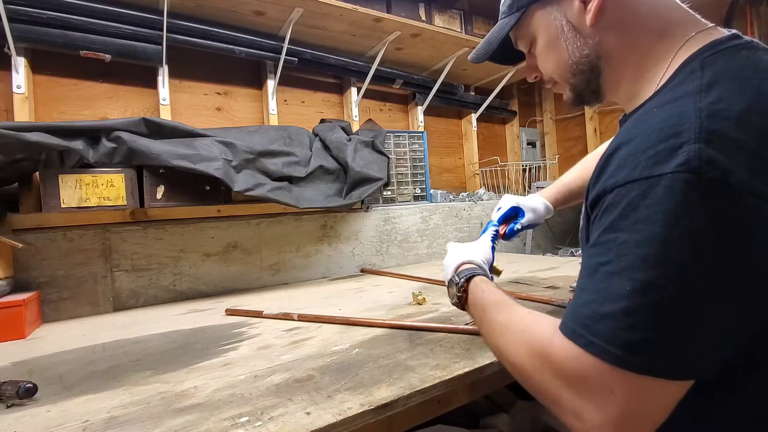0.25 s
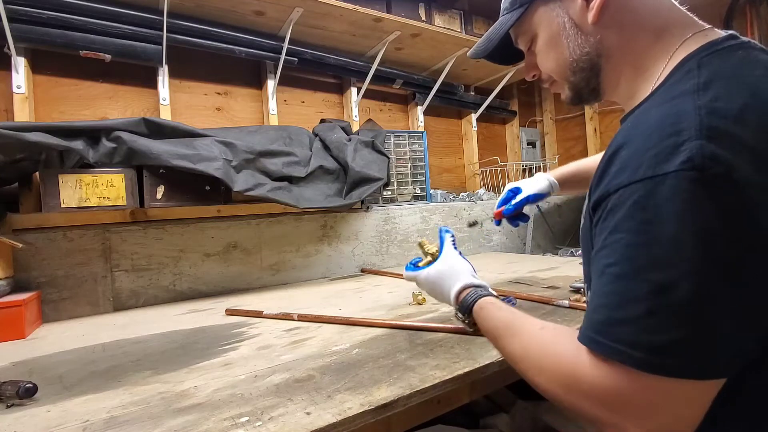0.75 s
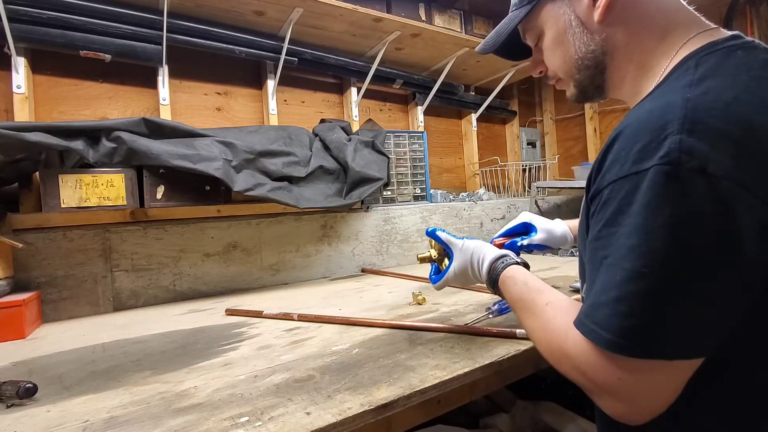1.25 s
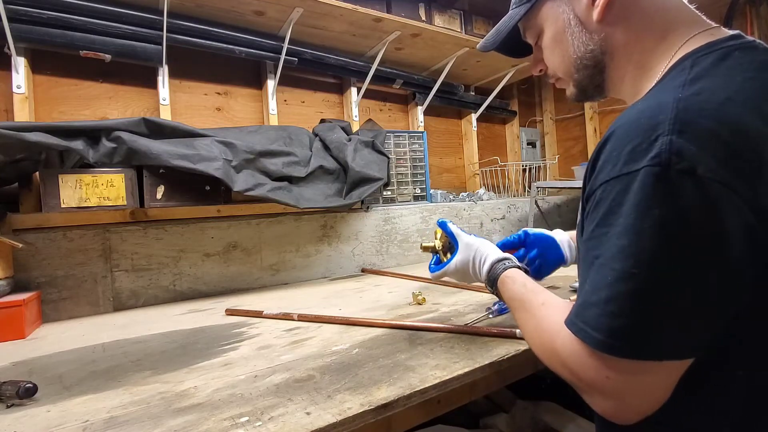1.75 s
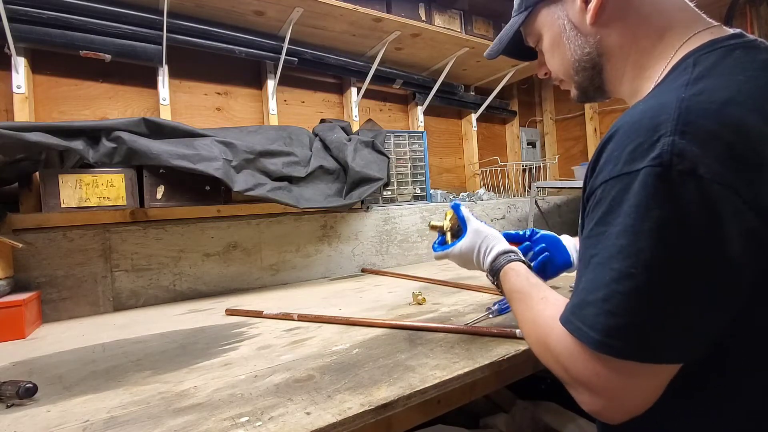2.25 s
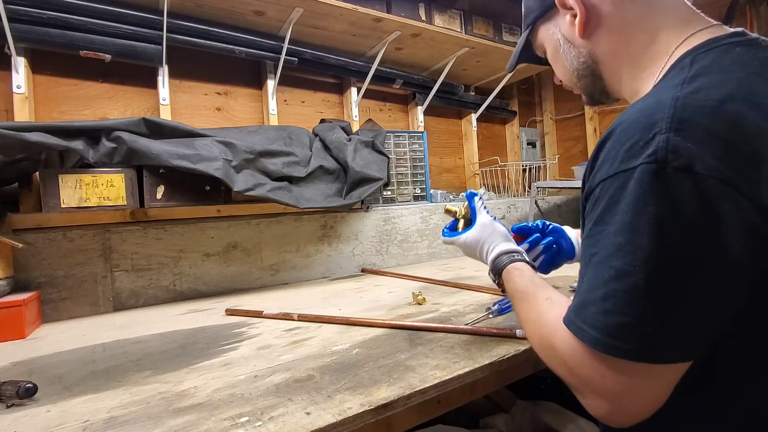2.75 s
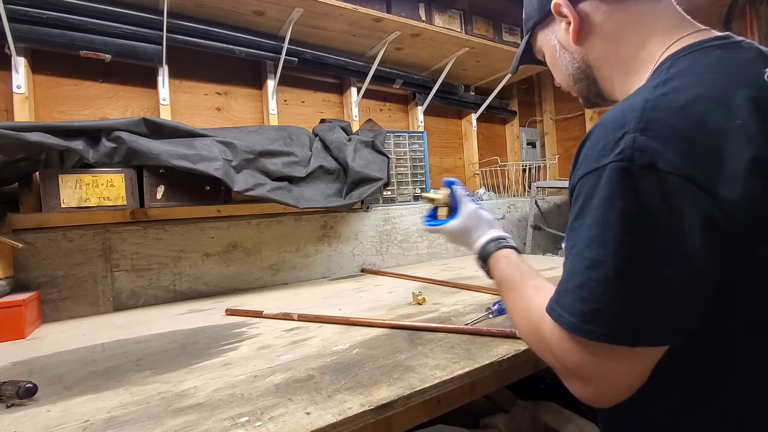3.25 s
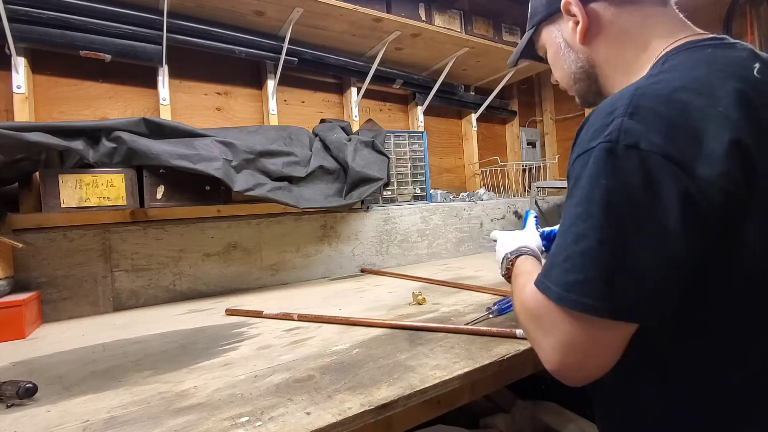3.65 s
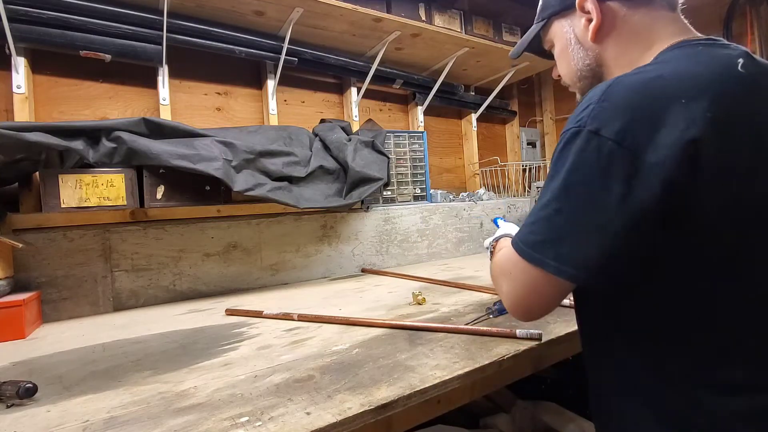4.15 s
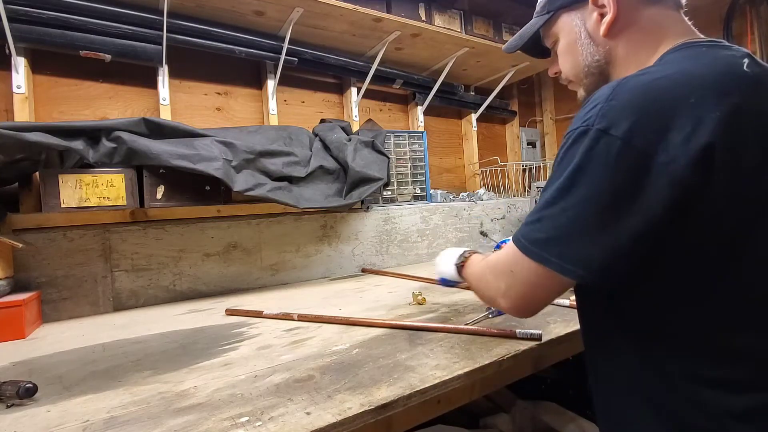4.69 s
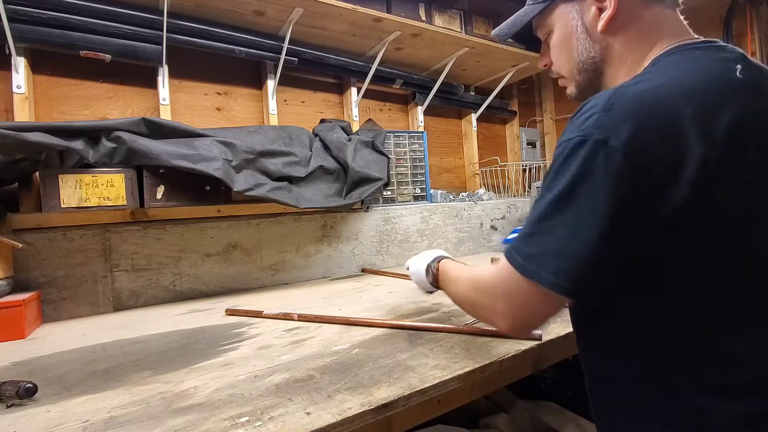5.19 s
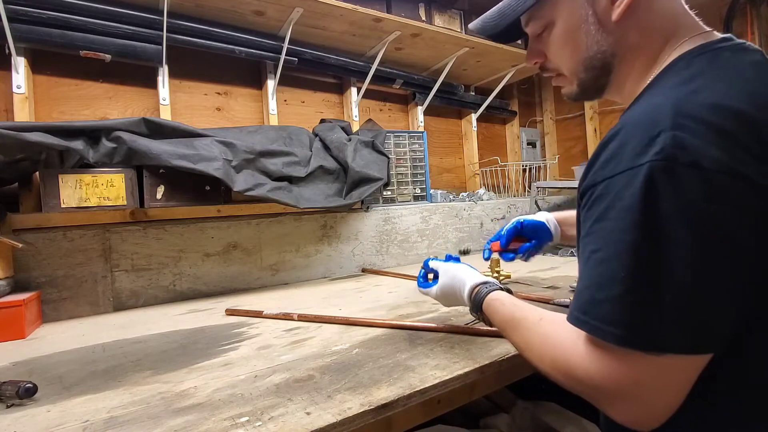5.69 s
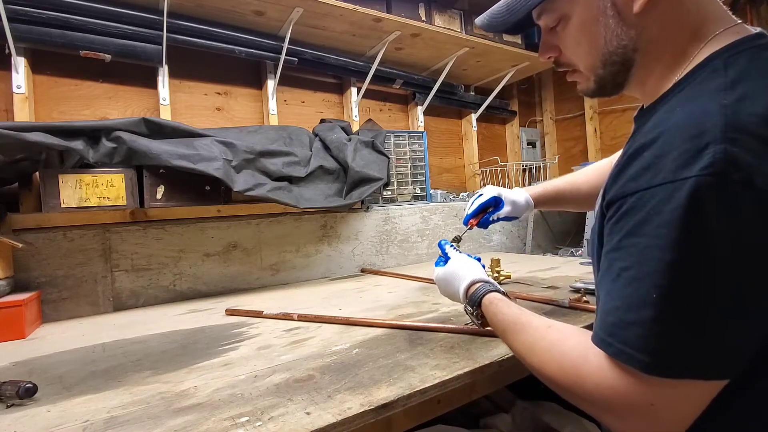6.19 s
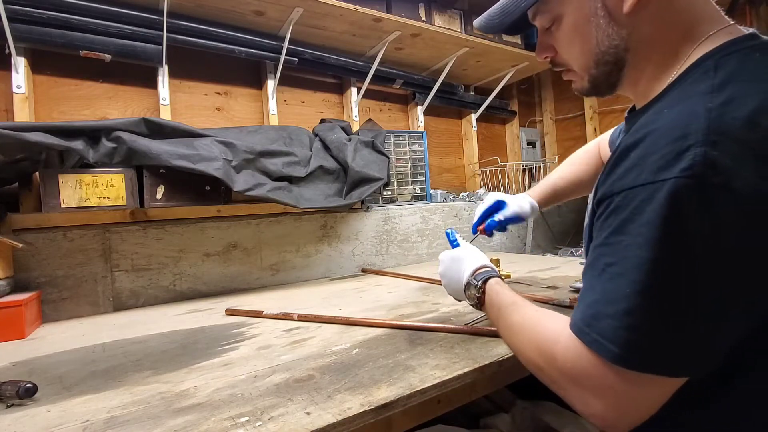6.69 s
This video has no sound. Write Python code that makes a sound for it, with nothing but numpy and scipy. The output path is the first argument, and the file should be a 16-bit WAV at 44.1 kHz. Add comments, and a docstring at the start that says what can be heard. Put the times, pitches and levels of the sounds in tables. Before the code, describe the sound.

In a timber workshop, close up in stereo, a wire brush scratches small brass fittings in short uneven twists, with bright clicks and thin pings. A pause brings faint sleeve rustle and a brass clink. Then a fitting lands on a wooden bench with a sudden hollow knock, the planks rocking and thudding, before brushing restarts. Low outdoor rumble and distant hum lie underneath.

```python
"""Timber workshop, about a metre away, on a stereo pair over low outdoor rumble and a distant hum.
A wire brush scratches in small brass fittings: wire tips stick and slip, and wires flick off the rim and make it ping.
A small fitting tings faintly, a sleeve rustles (rubbing fibres) and brass clinks on brass (struck modes).
A fitting lands on the wooden bench with a bright click and the planks ring; it tips over and the bench rocks and
thuds as the sleeve rustles on. Then the brushing starts again."""
import sys
import numpy as np
from scipy import signal
from scipy.fft import rfft, irfft, next_fast_len
from scipy.io import wavfile

SR = 44100
rng = np.random.default_rng(int(sys.argv[2]) if len(sys.argv) > 2 else 0)


def wrap_up_sound(samples):
    """Save the sound to the file named by the first command line argument, as 16-bit audio."""
    columns = np.atleast_2d(samples).T
    # keep every value between -1 and 1, then stretch to whole-number steps
    tamed = np.clip(columns, -1, 1)
    steps = np.round(tamed * 32767).astype(np.int16)
    wavfile.write(sys.argv[1], SR, steps)


N = 305613   # length in samples
T = np.arange(N) / SR


def from_db(db):
    """Decibels to gain."""
    return 10 ** (np.asarray(db) / 20)


def rms_one(x):
    """Scale to an rms of 1."""
    return x / np.sqrt(np.mean(x ** 2) + 1e-20)


def at_hz(points, hz):
    """Read a table on a log-frequency axis."""
    f, value = np.transpose(points)
    return np.interp(np.log(np.maximum(hz, 1)), np.log(f), value)


def filtered(x, order, cutoff_hz, kind="low"):
    """Butterworth filter."""
    return signal.sosfilt(signal.butter(order, cutoff_hz, kind, fs=SR, output="sos"), x)


def peak(x, hz, q):
    """A single resonance with a gain of 1 at its centre."""
    return signal.lfilter(*signal.iirpeak(hz, q, fs=SR), x)


def colour(x, spectrum):
    """Give a steady sound a spectrum that falls away below its first point; rms 1."""
    length = x.shape[-1]
    size = next_fast_len(length)
    hz = np.fft.rfftfreq(size, 1 / SR)
    bass_fall = np.minimum(hz / spectrum[0][0], 1) ** 2
    gain = from_db(at_hz(spectrum, hz)) * bass_fall
    return rms_one(irfft(rfft(x, size) * gain, size)[..., :length])


def resonate(x, peaks):
    """Parallel resonances (f/Hz, width/Hz, level/dB); rms 1."""
    return rms_one(sum(from_db(db) * peak(x, hz, hz / width) for hz, width, db in peaks))


def ring(modes, tilt_db=0):
    """One second of struck modes, tilted in dB per octave about their mean pitch."""
    t = T[:SR]
    centre = np.mean([mode[0] for mode in modes])
    out = np.zeros(SR)
    for hz, db, t60 in modes:
        level_db = db + tilt_db * np.log2(hz / centre) - 60 * t / t60
        out += from_db(level_db) * np.sin(2 * np.pi * hz * t)
    return out


def swell(rise_s):
    """One second of a gain that rises quickly from nothing to 1."""
    return 1 - np.exp(-T[:SR] / rise_s)


def crack(spectrum, t60):
    """One second of crowded modes, too many to tell apart, dying together."""
    modes = colour(rng.standard_normal(SR), spectrum)
    return modes * from_db(-60 * T[:SR] / t60) * swell(rise_s=0.0011)


def add(track, s, sound):
    """Mix a sound into the track at time s."""
    i = int(round(s * SR))
    track[i:i + len(sound)] += sound[:N - i]


ONSET_CURVE = 0.99   # exponent of the rise; above 1, a movement eases into its full strength


def envelope(moves, attack_s, release_s):
    """Gain for moves (t/s, hold/s, level/dB): each rises, holds and dies away, 20 dB in the given times."""
    db = np.full(N, -200.)
    for s, hold_s, top_db in moves:
        rising = np.maximum(s - T, 0) / attack_s
        falling = np.maximum(T - s - hold_s, 0) / release_s
        db = np.maximum(db, top_db - 20 * (rising ** ONSET_CURVE + falling))
    return from_db(db)


def drift(per_s):
    """Smooth chance with a spread of 1."""
    knots = rng.standard_normal(8000)
    return rms_one(np.interp(T * per_s, np.arange(len(knots)), knots))


def flicks(per_s, spread_db):
    """Random tiny contacts of uneven size, at a mean power that does not depend on their rate."""
    chance = np.clip(per_s / SR, 1e-4, 1)
    sizes = from_db(spread_db * np.minimum(rng.exponential(1, N), 4)) * rng.choice([-1, 1], N)
    happens = rng.random(N) < chance
    return rms_one(sizes * happens / np.sqrt(chance))


def bristles(tips, t60, size):
    """As a contact slides on, overlapping tufts of wires or fibres ring briefly, each at its own pitches."""
    out, t = np.zeros(N), T[:SR // 10]
    for i in range(0, N - size, size // 2):
        tuft = rms_one(rng.standard_normal(len(t)) * from_db(-60 * t / t60))
        contact = tips[i:i + size] * signal.windows.cosine(size)
        add(out, i / SR, signal.fftconvolve(contact, tuft))
    return rms_one(out)


# how alike diffuse sound is at the two microphones: (f/Hz, left-right correlation)
LIKENESS = [(60, 1), (130, 0.83), (290, 0.81), (640, 0.18), (1400, 0.017), (5000, 0.017), (14000, 0.81)]


def diffuse(size):
    """White stereo noise arriving from all sides, its left-right likeness set by frequency."""
    fast = next_fast_len(size)
    mid, side = rfft(rng.standard_normal((2, fast)))
    alike = np.clip(at_hz(LIKENESS, np.fft.rfftfreq(fast, 1 / SR)), -1, 1)
    common = np.sqrt(1 + alike) * mid
    opposed = np.sqrt(1 - alike) * side * [[1], [-1]]
    return irfft(common + opposed, fast)[:, :size]


# spectrum of the outdoor rumble: (f/Hz, level/dB per Hz, relative)
RUMBLE_COLOUR = [(25, -16), (48, -3.5), (70, -3.5), (110, -7.5), (200, -12), (400, -20), (800, -25),
                 (1500, -37.5), (3000, -56.5), (6500, -56.5), (13000, -49)]
# resonances of the distant hum: (f/Hz, width/Hz, level/dB)
HUM = [(68, 10, -0.5), (132.7, 4.7, -9.5), (193, 4.4, -8.5)]
RUMBLE_DB, HUM_DB = -55, -51.5


def ambience():
    """Low outdoor rumble with a wavering hum, which is noise through narrow resonances."""
    hum = resonate(resonate(rng.standard_normal(N), HUM), [(82, 184, 0)])
    return from_db(RUMBLE_DB) * colour(diffuse(N), RUMBLE_COLOUR) + from_db(HUM_DB) * hum


# twists and light grazes of the brush:
# (t/s at full pressure, hold/s, wire hiss level/dB before trim, bore rasp level/dB relative to the hiss)
STROKES = [(0.0, 0.011, -65.5, 15), (0.34, 0.092, -38, -12), (0.597, 0.006, -34.5, -20.5),
           (0.786, 0.063, -60, 1.5), (0.938, 0.046, -77.5, 10), (1.58, 0.047, -47.5, -5.5),
           (1.659, 0.026, -38.5, -14.5), (1.724, 0.083, -44.5, -18), (1.801, 0.038, -38.5, -8),
           (1.96, .035, -65, -4), (2.226, 0.07, -42.5, -8), (2.38, 0.055, -66.5, 2),
           (2.552, .02, -62.5, 10), (2.716, 0.058, -45, -8.5), (2.88, 0.033, -69, 13),
           (3.019, 0.033, -73, 14), (3.106, 0.085, -43.5, -6), (3.22, 0.037, -36.5, -9.5),
           (3.386, 0.051, -63.5, 3.5), (3.518, 0.038, -63, -30), (3.633, 0.078, -61, -7),
           (6.251, 0.015, -63.5, 7.5), (6.288, 0.0085, -61.5, -20), (6.422, 0.047, -64.5, -14),
           (6.535, 0.013, -64.5, 6), (6.59, .01, -49, -19), (6.706, 0.1, -40.5, -19),
           (6.78, 0.017, -36, -10), (6.894, .03, -57, 0.5)]
# between twists the wires rest lightly on the brass: (t/s, hold/s, level/dB before trim)
RESTING = [(0.0, 0.87, -77), (1.56, 1.6, -71.5)]
# spectra of the wires and of the rasping bore: (f/Hz, level/dB per Hz, relative)
WIRE_COLOUR = [(900, -30), (2000, -16), (4000, -11), (5500, -11.5), (7000, -14), (9000, -8), (11300, -4),
               (12400, -1.5), (13700, 5.5), (14600, 2), (15800, -3)]
RASP_COLOUR = [(400, 3.5), (800, -1), (1250, 2.5), (1800, -3), (2400, -2), (3300, -3.5), (4500, -11),
               (6000, -14), (8500, -7.5)]
# resonances of the fitting held in the glove: (f/Hz, width/Hz, level/dB)
BORE = [(2296, 210, 6), (3380, 500, -3), (4980, 47, 3), (5320, 280, -13), (7740, 150, -12), (9200, 22, 6)]
# the brush binds and squeaks: (t/s at the peak, Gaussian spread/s, f/Hz, level/dB)
SQUEAKS = [(0.388, 0.03, 2310, -56.5), (3.215, 0.062, 2650, -63.5), (6.579, 0.006, 2200, -52),
           (6.784, 0.0092, 2590, -45)]
STROKE_ATTACK_S, STROKE_RELEASE_S = 0.05, 0.06   # time to rise or fall by 20 dB
RASP_ATTACK_S, RASP_RELEASE_S = 0.076, 0.046   # the same for the bore
RESTING_RASP_DB, RESTING_WAVER_DB = -6, 4   # resting wires: rasp relative to the hiss, unevenness


def brush():
    """Wire tips stick and slip in the bore: a harder stroke frees more of them, in uneven bunches."""
    resting = envelope(RESTING, attack_s=0.059, release_s=0.41) * from_db(RESTING_WAVER_DB * drift(25))
    hiss_moves = [(s, hold, db) for s, hold, db, _ in STROKES]
    rasp_moves = [(s, hold, db + bore_db) for s, hold, db, bore_db in STROKES]
    hiss = np.hypot(envelope(hiss_moves, STROKE_ATTACK_S, STROKE_RELEASE_S), resting)
    rasp = envelope(rasp_moves, RASP_ATTACK_S, RASP_RELEASE_S)
    rasp = np.hypot(rasp, from_db(RESTING_RASP_DB) * resting)

    bunches = from_db(2.5 * drift(170))
    tips_per_s = 1200 + 7000 * np.sqrt(hiss / hiss.max())
    tips = flicks(tips_per_s, spread_db=1.5) * bunches
    scratch = rms_one(tips) + 0.85 * bristles(tips, t60=0.03, size=4000)

    wires = from_db(-2.5) * hiss * colour(scratch, WIRE_COLOUR)
    rough = from_db(-8.5) * colour(scratch, RASP_COLOUR)
    resonant = from_db(-18.5) * resonate(scratch, BORE)
    out = wires + rasp * (rough + resonant)
    for s, spread_s, hz, db in SQUEAKS:
        pulse = np.exp(-0.5 * ((T - s) / spread_s) ** 2)
        tone = resonate(resonate(tips, [(hz, 480, 0)]), [(hz, 480, 0)])
        out += from_db(db) * pulse * tone
    return out


# wires snapping off the rim, and at 4.933 s the fitting striking the bench:
# (t/s, click level/dB, ring level/dB, ring tilt/dB per octave)
CLICKS = [(0.528, -49, -65, 10), (0.609, -41, -50, -7), (1.388, -60, -47, 23), (1.556, -45, -48.5, 8),
          (2.188, -52, -48, 31), (2.459, -47.5, -77, 0), (3.255, -33, -41, 0), (3.609, -48.5, -78, -23),
          (4.933, -37, -64, -12), (6.205, -37.5, -65, -12), (6.284, -53, -58, 40), (6.488, -67, -62, 44),
          (6.573, -40.5, -46, 28)]
# modes of the metal ring, those of the brushed rim: (f/Hz, level/dB, t60/s)
RIM = [(9440, -2, .24), (9500, -9, .14), (13120, -11, .24), (13440, -3, .12), (13760, -4, .17),
       (13870, -5, .22), (14100, -9, .1)]


def bright_clicks():
    """Bright clicks that may leave a metal ring: wires snapping off the rim, once a fitting on the bench."""
    out = np.zeros(N)
    for s, click_db, ring_db, tilt_db in CLICKS:
        tick = crack(WIRE_COLOUR, t60=0.02) + from_db(-9) * crack(RASP_COLOUR, t60=0.056)
        ping = ring(RIM, tilt_db) * swell(rise_s=0.0013)
        add(out, s, from_db(click_db) * tick + from_db(ring_db) * ping)
    return out


# a small fitting tings faintly as the wires brush a different part of it: (t/s, f/Hz, level/dB)
TINGS = [(3.608, 9200, -50.5), (3.9, 7434, -73)]


def tings():
    """A small fitting rings with one clear mode at each touch of the wires."""
    out = np.zeros(N)
    for s, hz, db in TINGS:
        add(out, s, ring([(hz, db, 0.2)]) * swell(rise_s=0.0078))
    return out


# moves of sleeve and gloves:
# (t/s, hold/s, rubbing level/dB before trim, fibre hiss level/dB relative to the rubbing)
SLEEVE = [(3.92, 0.69, -87, 15.5), (4.31, .16, -61.5, -1.5), (4.57, 0.0084, -71, 2),
          (4.796, .03, -100, 25.5), (4.991, 0.088, -58.5, -8.5), (5.233, 0.2, -63, -0.5),
          (5.505, 0.044, -55.5, -6.5), (5.603, 0.33, -63, -5)]
# spectra of the rubbing cloth and of its fibres' hiss: (f/Hz, level/dB per Hz, relative)
CLOTH_COLOUR = [(600, 6.5), (1400, 1), (2000, 0.5), (2700, 2.5), (3500, -2), (4500, -7.5), (6500, -19),
                (9000, -17), (15000, -27)]
FIBRE_COLOUR = [(4000, -17), (7000, -11), (9000, -3), (11500, 0), (15800, -1.5)]
SLEEVE_ATTACK_S, SLEEVE_RELEASE_S = 0.074, 0.11   # time for a rustle to rise or fall by 20 dB


def sleeve():
    """Cloth fibres catch and slide as the hands shift their grip and the arm reaches out and back."""
    fibres = flicks(9000, spread_db=-1) * from_db(2 * drift(60))
    scuffs = bristles(fibres, t60=0.008, size=7000)
    rub = colour(rms_one(fibres) + 0.81 * scuffs, CLOTH_COLOUR)
    rub_moves = [(s, hold, db) for s, hold, db, _ in SLEEVE]
    hiss_moves = [(s, hold, db + fibre_db) for s, hold, db, fibre_db in SLEEVE]
    rubbing = envelope(rub_moves, SLEEVE_ATTACK_S, SLEEVE_RELEASE_S)
    hiss = envelope(hiss_moves, SLEEVE_ATTACK_S, SLEEVE_RELEASE_S)
    return from_db(-1.5) * (rubbing * rub + hiss * colour(fibres, FIBRE_COLOUR))


# brass on brass: (t/s, crack level/dB, ring level/dB)
CLINKS = [(4.085, -78, -77), (4.268, -55.5, -85), (4.284, -31.5, -36)]
# modes of the struck fitting: (f/Hz, level/dB, t60/s)
BRASS = [(1572, 2, .09), (2442, 7, .1), (5037, -7.5, .34), (5952, -.5, .29), (6934, -12, .25),
         (7672, -2.5, .22), (10040, -10, .17), (11440, -14, .26), (13990, -19, .22)]
# spectrum of the crack: (f/Hz, level/dB per Hz, relative)
CLINK_COLOUR = [(400, -27), (800, -8.5), (1200, -8), (1600, -0.5), (2000, -10), (2450, -1), (3200, -8.5),
                (5000, -14), (9000, -26), (16000, -24)]


def clinks():
    """A fitting grazes another, then strikes it; the ring wavers as the hand turns the part."""
    out = np.zeros(N)
    for s, crack_db, ring_db in CLINKS:
        waver = from_db(2 * drift(49)[:SR])
        tone = ring(BRASS) * swell(rise_s=0.0092) * waver
        add(out, s, from_db(crack_db) * crack(CLINK_COLOUR, t60=0.091) + from_db(ring_db) * tone)
    return out


# after the landing the bench rocks in short bouts: (t/s, first thud level/dB before trim, thuds, gap/s)
ROCKING = [(5.161, -26, 2, .029), (5.282, -28, 2, 0.037), (5.443, -25.5, 4, 0.053), (5.726, -30.5, 2, 0.05),
           (5.863, -29, 2, .029), (5.958, -33.5, 2, .069), (6.191, -44, 2, 0.067)]
ROCK_CONTACT_HZ = 264   # low-pass corner of the first thud of a bout
ROCK_LOSS_DB, ROCK_DULLING = 0.3, 0.85   # each later thud is weaker by this much, duller by this factor


def thuds():
    """Each bout of rocking is an even run of blows that grow weaker and duller."""
    blows = []
    for s, db, count, gap_s in ROCKING:
        for k in range(int(round(count))):
            contact_hz = ROCK_CONTACT_HZ * ROCK_DULLING ** k
            blows.append((s + k * gap_s, db - k * ROCK_LOSS_DB, contact_hz))
    return blows


# the fitting lands and bounces on the bench: (t/s, level/dB before trim, low-pass corner of the contact f/Hz)
BLOWS = [(4.9094, -22.5, 3600), (4.917, -15, 720), (4.9364, -31, 1470), (4.9516, -26.5, 900),
         (4.959, -12, 91), (4.97, -17.5, 198), (5.039, -32.5, 746)]
# modes of the bench: (f/Hz, level/dB, t60/s)
BENCH = [(88, -4, 0.55), (125.7, -10, 0.66), (157.1, -6.5, 0.64), (172.8, 6.5, 0.2), (264, 2, 0.044),
         (280, -2.5, 0.22), (293.2, -1, 0.07), (355, -3.5, 0.04), (503, -22.5, 1), (536, -20, 0.098),
         (717, -7.5, 0.13)]
# spectra of the planks and of the tipping: (f/Hz, level/dB per Hz, relative)
PLANK_COLOUR = [(300, -4), (480, 4.5), (700, -6), (1000, -4), (1500, -17.5), (2500, -19.5), (3500, -32),
                (6000, -31), (12000, -18)]
TIP_COLOUR = [(300, 5), (750, 15), (1150, 6.5), (1600, -7), (2200, -20), (5000, -50), (12000, -30)]
# the fitting tips over on the wood: (t/s, level/dB before trim)
TIPS = [(5.092, -29)]
# the bench shudders: (t/s, hold/s, level/dB before trim)
SWAY = [(5.05, 0.53, -36), (5.7, 0.61, -42)]
# resonances of the shudder: (f/Hz, width/Hz, level/dB)
SWAY_MODES = [(69.36, 2.85, -0.5), (83.2, 11, -18), (88.9, 5.5, -4.5), (145, 46, -11)]
SWAY_ATTACK_S, SWAY_RELEASE_S = 0.032, 0.67   # time for the shudder to rise or fall by 20 dB


def bench():
    """Every blow rings the same planks; a soft contact reaches only the low modes."""
    out, modes = np.zeros(N), ring(BENCH)
    for s, db, contact_hz in BLOWS + thuds():
        wood = modes + from_db(-0.5) * crack(PLANK_COLOUR, t60=0.25)
        add(out, s, from_db(db - 6) * filtered(wood, 3, contact_hz))
    for s, db in TIPS:
        add(out, s, from_db(db - 5.5) * crack(TIP_COLOUR, t60=0.17))
    out = filtered(out, 3, 70, "high")   # the knock carries little below 70 Hz
    shudder = resonate(resonate(rng.standard_normal(N), SWAY_MODES), [(83.5, 58, 0)])
    return out + from_db(-2) * envelope(SWAY, SWAY_ATTACK_S, SWAY_RELEASE_S) * shudder


# reverberation of the workshop: (f/Hz, t60/s)
ROOM_T60 = [(100, 0.31), (500, 0.37), (2000, 0.37), (5000, 0.33), (14000, 0.3)]


def workshop(x):
    """Reverberation: dense reflections that build up and die band by band."""
    t, tail = T[:SR], diffuse(SR)
    edges, response = np.geomspace(50, 18000, 9), 0
    for low, high in zip(edges, edges[1:]):
        band = filtered(tail, 2, [low, high], "band")
        response = response + band * from_db(-60 * t / at_hz(ROOM_T60, np.sqrt(low * high)))
    response = rms_one(response * swell(rise_s=0.00067)) / np.sqrt(SR)
    return signal.fftconvolve(x[None], response, axes=1)[:, :N]


def scene():
    """All sources are about a metre away; each stirs the room by its own amount."""
    scrub, pings, cloth, brass, wood = brush(), bright_clicks() + tings(), sleeve(), clinks(), bench()
    # the top octave of brush, clicks and tings beams straight ahead, the rest spreads round the room
    spread = filtered(scrub + pings, 1, 7000)
    # the bench's bass comes mostly direct, its clatter by way of the walls
    clatter = filtered(wood, 1, 330, "high")
    sent = from_db(1) * spread + from_db(-3) * brass + from_db(1.8) * clatter + from_db(-1.6) * cloth
    # the knock reaches the right 6 samples late; after the left port's phase lag it arrives at both sides
    # together
    knock = np.array([wood, np.roll(wood, 6)])
    direct = scrub + pings + brass + cloth + from_db(1.5) * knock
    return direct + workshop(sent) + ambience()


def record(dry):
    """The left microphone is louder; its port resonates and turns the phase in the presence range."""
    left, right = dry
    left = left - 2 * peak(left, 3200, 1.3)   # all-pass: turns the phase only
    left = left + from_db(5.5) * peak(left, 2300, 1.3)
    pair = np.array([from_db(0.8) * left, from_db(-1.8) * right])
    # steep treble cutoff at 15.9 kHz
    return signal.sosfilt(signal.ellip(12, 0.2, 80, 15900, fs=SR, output="sos"), pair)


dry = scene()
out = record(dry)
wrap_up_sound(out)
```